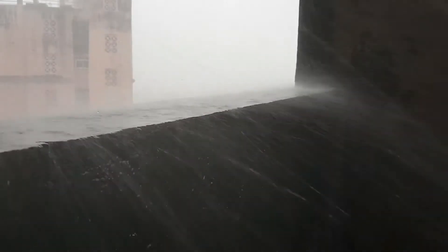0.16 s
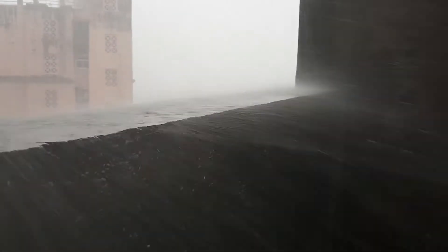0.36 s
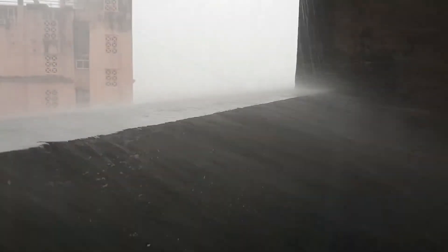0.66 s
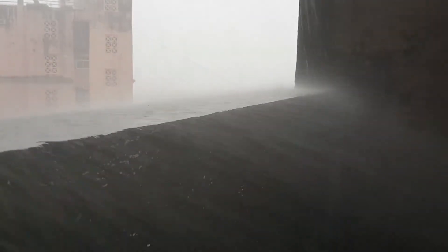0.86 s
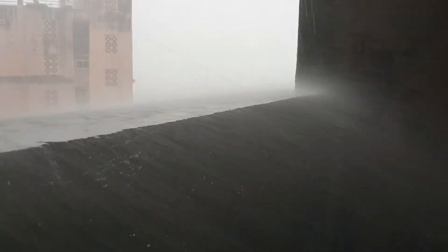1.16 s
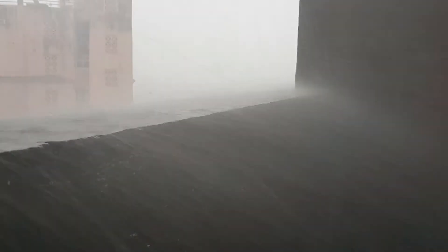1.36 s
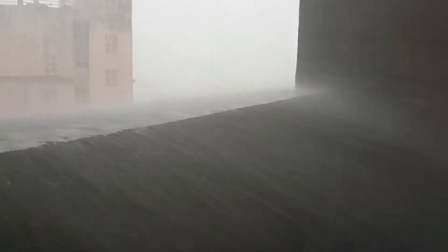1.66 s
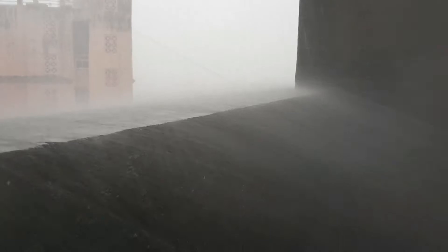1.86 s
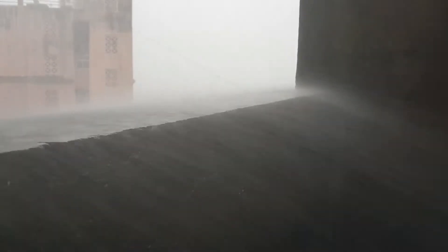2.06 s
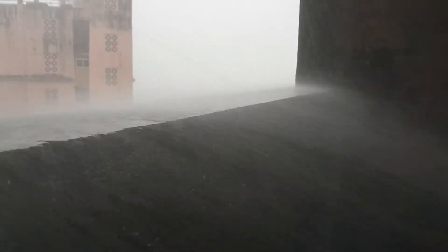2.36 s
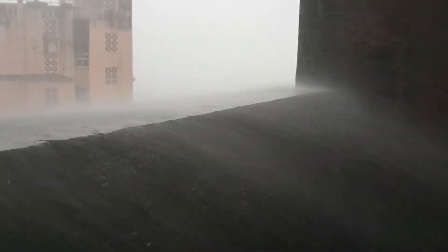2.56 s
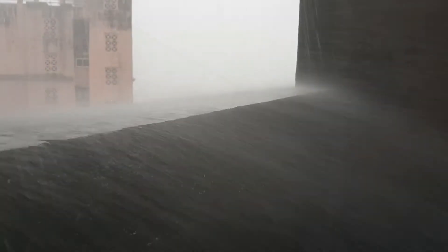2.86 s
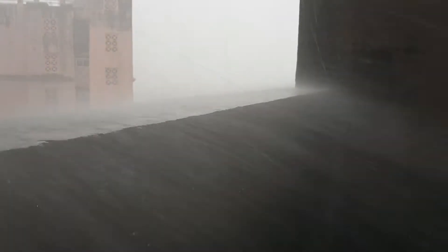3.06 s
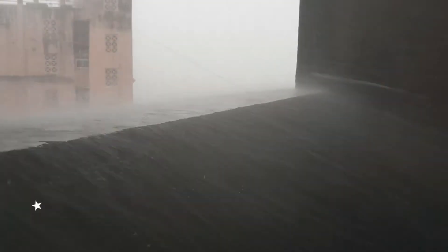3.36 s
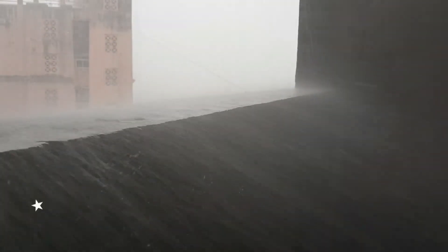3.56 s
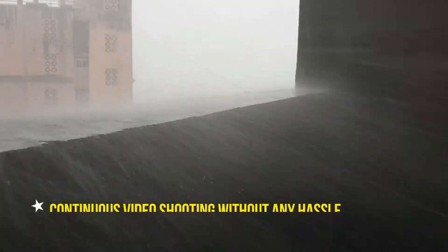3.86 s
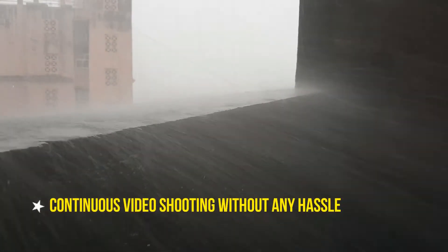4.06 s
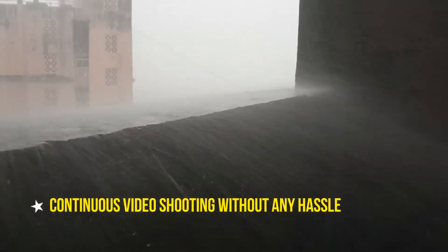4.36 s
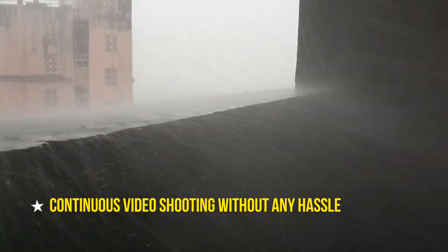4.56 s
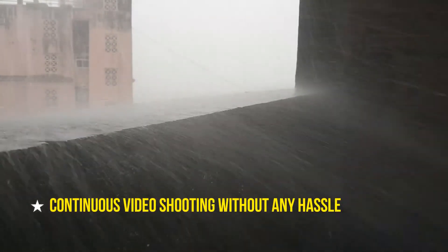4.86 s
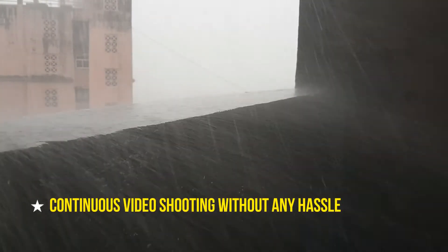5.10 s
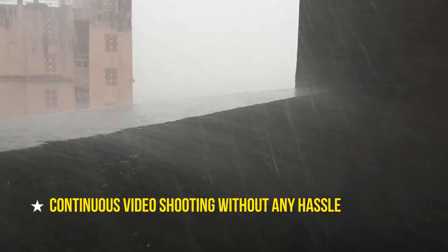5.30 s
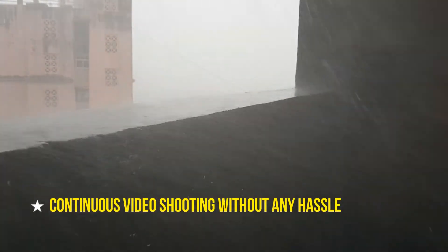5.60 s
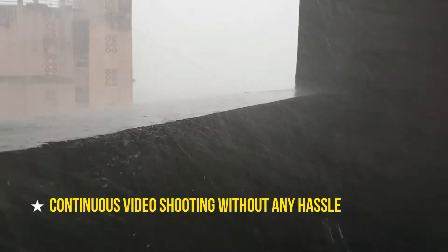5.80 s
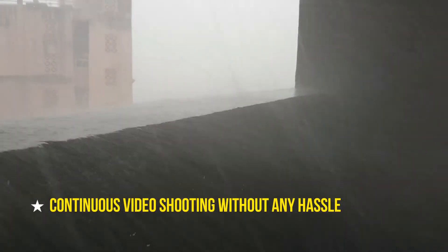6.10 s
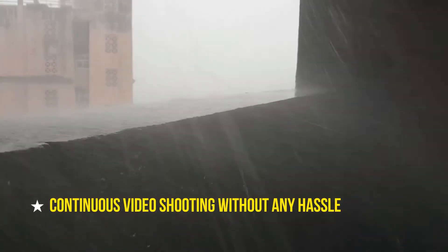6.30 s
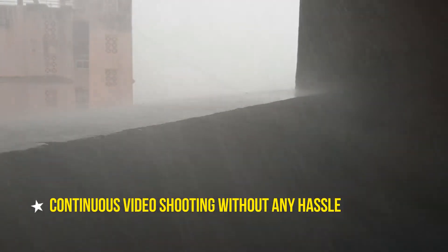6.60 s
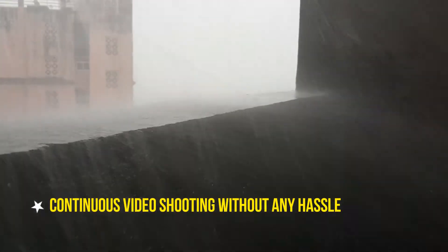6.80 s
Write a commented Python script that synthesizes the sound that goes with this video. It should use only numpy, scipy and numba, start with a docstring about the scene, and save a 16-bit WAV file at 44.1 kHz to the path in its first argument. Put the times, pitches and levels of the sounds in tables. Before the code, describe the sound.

Blown rain pelts a device at a window: rough muffled wind flutter, crowded distorted drop knocks on the left, a softer hollow rush on the right.

```python
"""At an open window in a driving rainstorm, a phone is held out with its two wet microphone ports in the wind.
Gusts blow across the ports, which ring like small bottles: the left one low, the right one higher.
Drops are decaying sines with a shove and a splash; the strong ones overload into short buzzing ticks.
Spray spatters on the left port as filtered random hits.
Behind them lie the steady coloured noise of the downpour and a thin microphone hiss."""
import sys
import numpy as np
from scipy import signal
from scipy.fft import rfft, irfft, next_fast_len
from scipy.io import wavfile
from scipy.ndimage import uniform_filter1d
from numba import njit

SR = 44100
rng = np.random.default_rng(int(sys.argv[2]) if len(sys.argv) > 2 else 0)


def transcribe(signal):
    """Save signal, clipped to [-1, 1], as a 16-bit WAV file at the path in sys.argv[1]."""
    frames = np.atleast_2d(signal).T
    limited = np.clip(frames, -1, 1)
    pcm = np.round(limited * 32767).astype(np.int16)
    wavfile.write(sys.argv[1], SR, pcm)


N = 306054

# Pitch of the left port, lower as it fills with water: start_s, pitch_hz
LEFT_PORT_PITCH = [(0, 480), (1.0, 511), (1.9, 491), (2.9, 567), (3.5, 525), (4.2, 496.6), (5.2, 512.6),
                   (6.1, 482.5), (6.55, 421), (6.94, 483)]
LEFT_WIDTH_HZ = 247  # width of the left port's resonance


def left_microphone():
    """The windward port takes most of the gusts and the drops; sloshing water makes its pitch waver."""
    filled_hz = in_time(LEFT_PORT_PITCH)
    port_hz = filled_hz * np.exp(0.056 * drift(25.0))
    thickness = spray_thickness()
    wind = left_wind(port_hz)
    mist = left_spray(thickness, port_hz)
    drops = left_drops(thickness, filled_hz)
    return wind + mist + drops


# Turbulence and blown spray outside the left port: pitch_hz, level_db (per Hz, relative)
LEFT_EDDY_COLOUR = [(15, -9), (30, -19), (60, -7), (110, -1), (220, -3.5), (350, -8.5), (520, -6.5),
                    (750, -19.5), (1100, -16.5), (2000, -27), (4000, -29), (7000, -43), (15000, -14)]
# Wind on the left port before brief swings, flutter and trim: start_s, level_db
LEFT_WIND_LEVEL = [(0, -17), (0.2, -2.5), (0.45, -8), (1.05, -8), (1.4, -19), (1.88, -1), (2.15, -9),
                   (2.42, -19), (3.0, -11), (3.35, -15), (4.0, -7), (4.5, -11), (5.15, -6), (5.35, -15),
                   (5.65, -5.5), (6.2, -10.5), (6.55, 1.5), (6.94, -8)]


def left_wind(port_hz):
    """Fluttering wind with brief swings on top, blowing across the low port."""
    flutter_db = 1.92 * drift(18)
    level_db = in_time(LEFT_WIND_LEVEL) + brief_swings() + flutter_db
    blown = buffeting(LEFT_EDDY_COLOUR, port_hz, LEFT_WIDTH_HZ, lumpy_db=4.0, lumps_hz=59)
    return from_db(level_db - 2.5) * blown


# Short gusts and one brief slackening, timed at the middle: start_s, level_db (change there)
WIND_SWINGS = [(3.691, 11.5), (3.99, 7), (4.1, 6.5), (4.34, 6.5), (4.6, 10), (5.04, 5), (5.492, 15.5),
               (5.691, 4), (5.9, 7.5), (6.37, -2), (6.62, 1.5)]
SWING_HALF_S = 0.049  # from the middle to 1/e of the change in dB


def brief_swings():
    """Short gusts and one brief slackening, each a bell-shaped change in dB."""
    t = np.arange(N) / SR
    return sum(db * np.exp(-((t - s) / SWING_HALF_S) ** 2) for s, db in WIND_SWINGS)


# Distinct drops striking the left port, mostly big, before the trim on all drops: start_s, level_db
LEFT_DISTINCT_DROPS = [(0.168, 1.5), (0.254, 19.5), (0.273, 15), (0.448, -4), (0.473, 23.5), (0.507, 4),
                       (0.642, 4), (0.66, 19), (0.675, 11), (0.904, 16.5), (0.978, 5), (1.0, 14),
                       (1.158, 7.5), (1.188, 6.5), (1.254, -1.5), (1.426, 2.5), (1.499, 7.5), (1.524, 23.5),
                       (1.551, 8), (1.669, 19.5), (1.718, 3), (1.781, 5), (1.823, 17), (1.854, 5),
                       (1.888, 17.5), (1.912, 7.5), (1.923, 3.5), (1.993, 2), (2.092, 8.5), (2.108, 10.5),
                       (2.142, 10), (2.193, 14.5), (2.213, 18.5), (2.23, 17.5), (2.306, 20.5), (2.33, 16),
                       (2.378, 11.5), (2.459, -11), (2.472, 19), (2.548, 19.5), (2.599, 17.5), (2.755, 15),
                       (2.824, -1), (2.936, 20.5), (2.96, 8), (2.976, 2.5), (2.984, 15), (3.056, 6.5),
                       (3.076, 10), (3.086, 18), (3.128, 13), (3.159, 4), (3.264, 6.5), (3.286, 14.5),
                       (3.455, 13), (3.569, 19.5), (3.639, 11), (3.717, 2), (3.982, 6), (3.997, 4.5),
                       (4.152, 14.5), (4.221, 10.5), (4.252, 19.5), (4.277, 19.5), (4.295, 11), (4.35, 6.5),
                       (4.389, 17.5), (4.419, 7.5), (4.471, 11), (4.494, 17), (4.541, 2.5), (4.585, 15),
                       (4.597, 18), (4.632, 2), (4.689, 18.5), (4.721, 27.5), (4.772, 5), (4.873, 17.5),
                       (4.985, 11.5), (5.043, 12), (5.067, 16.5), (5.103, 19.5), (5.129, 17.5),
                       (5.157, 12.5), (5.18, 22), (5.207, 18.5), (5.286, 3), (5.34, 2), (5.448, 11),
                       (5.465, 3), (5.531, 7), (5.585, 11), (5.659, 3), (5.682, 13), (5.821, 4),
                       (5.836, 5.5), (5.87, 3), (5.88, 16.5), (5.904, 19.5), (5.922, 5), (5.956, 19),
                       (5.983, 23), (6.006, 20.5), (6.045, 4.5), (6.142, 24), (6.166, 23.5), (6.185, 16.5),
                       (6.359, 2), (6.419, 8), (6.435, 23), (6.505, 19.5), (6.521, 9.5), (6.559, 4),
                       (6.587, 14.5), (6.602, 18), (6.648, 11), (6.69, 24.5), (6.733, 19), (6.776, 8.5),
                       (6.807, 18.5), (6.831, 5), (6.856, 23.5), (6.875, 17)]
SMALL_PER_S, SMALL_DB = 22.0, -2  # at mean spray thickness; before the same trim
DROP_DETUNE = 0.059  # each drop leaves a different plug of water: spread of its ring, as a share of the pitch


def left_drops(thickness, filled_hz):
    """Distinct drops, and small ones at random among them, more often in thick spray."""
    falling = list(LEFT_DISTINCT_DROPS) + small_drops(SMALL_PER_S * thickness, SMALL_DB)
    rows = []
    for s, db in falling:
        hz = filled_hz[int(s * SR)] * np.exp(rng.normal(0, DROP_DETUNE))
        rows.append((s, db, hz))
    drops = strikes(rows, rise_s=0.00045, fall_s=0.0026, glide=0.089, shove_db=-9.5,
                    splash_db=-19.5, splash_s=0.0026, splash_hz=1970)
    return from_db(-1.5) * drops


def small_drops(per_s, level_db):
    """Rows (start_s, level_db) of drops at chance moments, with sizes scattered about a level."""
    moments = np.flatnonzero(rng.random(N) < per_s / SR)
    spread_db = 1.5
    db = level_db + spread_db * rng.standard_normal(N)
    return [(i / SR, db[i]) for i in moments]


def strikes(rows, rise_s, fall_s, glide, shove_db, splash_db, splash_s, splash_hz):
    """Each drop (start_s, level_db, pitch_hz) shoves the air, rings the port and bursts with a splash."""
    lead = SR // 50
    out = np.zeros(N + SR)
    t = np.arange(-lead, 4 * lead) / SR
    since = np.maximum(t, 0)
    swell = 2 / (1 + np.exp(np.minimum(-t / rise_s, 50)))
    bass = signal.butter(2, [90, 280], "band", fs=SR, output="sos")
    # water thrown up by the burst falls back as a faint longer tail
    scatter_db, scatter_s = -40, 0.012
    splashing = np.exp(-since / splash_s) + from_db(scatter_db) * np.exp(-since / scatter_s)
    for s, db, hz in rows:
        phase = rng.random()
        bend = rng.normal(0, glide)
        cycles = hz * (t + bend * fall_s * np.tanh(t / fall_s))  # the spreading drop bends the pitch
        tone = np.sin(2 * np.pi * (cycles + phase))
        shove = rms_one(signal.sosfilt(bass, rng.standard_normal(len(t))))
        ring = (tone + from_db(shove_db) * shove) * np.exp(-since / fall_s)
        splash = rms_one(low_pass(rng.standard_normal(len(t)), splash_hz, order=2)) * splashing
        start = max(round(s * SR), 0)
        out[start:start + len(t)] += from_db(db) * swell * (ring + from_db(splash_db) * splash)
    return out[lead:lead + N]


# Thickness of the blown spray; only its swing about the mean counts: start_s, level_db
SPRAY_LEVEL = [(0.0, -59.5), (0.67, -44), (1.0, -50.5), (1.37, -46), (2.16, -46), (2.84, -57.5),
               (3.19, -44.5), (3.73, -59.5), (4.39, -40.5), (4.79, -56.5), (5.14, -41.5), (5.84, -51.5),
               (6.18, -63.5), (6.43, -42), (6.61, -35.5), (6.94, -51.5)]


def spray_thickness():
    """Gain of the spray about its mean in dB, taking only a share of the swing."""
    level_db = in_time(SPRAY_LEVEL)
    share = 0.4
    return from_db(share * (level_db - level_db.mean()))


def left_spray(thickness, port_hz):
    """Spray on the left port grows both denser and louder as it thickens."""
    mist = spray(port_hz, LEFT_WIDTH_HZ, per_s=220 * thickness, spread_db=30.0,
                 spatter_db=-22.5, spatter_hz=3300)
    return from_db(-21.5) * thickness * mist


def spray(port_hz, width_hz, per_s, spread_db, spatter_db, spatter_hz):
    """Fine droplets land in flurries: each pushes softly on the port and spatters for about a millisecond."""
    sizes = from_db(spread_db * rng.random(N)) * rng.choice([-1, 1], N)
    flurries = from_db(7.0 * drift(20))
    landed = rng.random(N) < per_s * flurries / SR
    hits = sizes * landed + 1e-18
    push = rms_one(port(low_pass(hits, 1600, order=2), port_hz, width_hz))
    decay_s = 0.00054
    envelope = signal.lfilter([1], [1, -np.exp(-1 / (decay_s * SR))], hits)
    spatter = low_pass(envelope * rng.standard_normal(N), spatter_hz, order=3)
    return push + from_db(spatter_db) * rms_one(spatter)


RIGHT_PORT_HZ, RIGHT_WIDTH_HZ = 1067, 116  # middle pitch, and width of the resonance


def right_microphone():
    """The sheltered port stays clearer and rings about an octave higher, in a hollow rush that comes and goes."""
    port_hz = RIGHT_PORT_HZ * np.exp(0.042 * drift(4.1))
    return right_wind(port_hz) + right_drops()


# Turbulence and blown spray outside the right port: pitch_hz, level_db (per Hz, relative)
RIGHT_EDDY_COLOUR = [(15, -24), (30, -17), (60, 6), (120, 1), (250, -2.5), (500, -4.5), (800, -11),
                     (1100, -16.5), (1600, -22.5), (2500, -33.5), (5000, -40), (10000, -42.5), (15000, -22)]
# Wind on the right port before flutter and trim: start_s, level_db
RIGHT_WIND_LEVEL = [(0, -26.5), (0.8, -21), (1.08, -27), (1.3, -10.5), (1.5, -15.5), (1.78, -16.5),
                    (2.55, -14), (3.1, -19.5), (3.95, -24), (4.35, -28.5), (4.9, -27), (5.15, -31),
                    (5.45, -22), (5.65, -28), (6.0, -32.5), (6.28, -15.5), (6.48, -27.5), (6.94, -23.5)]


def right_wind(port_hz):
    """Fluttering wind across the higher port, strongest in a lull of the left one."""
    flutter_db = 2.45 * drift(18)
    level_db = in_time(RIGHT_WIND_LEVEL) + flutter_db
    blown = buffeting(RIGHT_EDDY_COLOUR, port_hz, RIGHT_WIDTH_HZ, lumpy_db=3.0, lumps_hz=62)
    return from_db(level_db + 1.03) * blown


# Distinct drops striking the right port, before the trim on all of them: start_s, level_db
RIGHT_DISTINCT_DROPS = [(0.229, -1.5), (1.265, 1.5), (1.332, 1), (1.386, 0.5), (2.248, 1), (2.414, -2.5),
                        (2.529, 1), (2.884, -9), (3.028, -1.5), (4.758, -2.5), (5.468, -5), (6.375, -2.5)]


def right_drops():
    """A few drops ring the right port at its middle pitch, with hardly any splash."""
    rows = [(s, db, RIGHT_PORT_HZ) for s, db in RIGHT_DISTINCT_DROPS]
    drops = strikes(rows, rise_s=0.0017, fall_s=0.0022, glide=0.045, shove_db=-8.5,
                    splash_db=-44, splash_s=0.0015, splash_hz=1500)
    return from_db(-1.0) * drops


def buffeting(eddies, port_hz, width_hz, lumpy_db, lumps_hz):
    """Eddies arrive in lumps and blow across a port; the mean force over a tenth of a second is steady."""
    lumps = from_db(lumpy_db * drift(lumps_hz))
    blown = port(noise(eddies) * lumps, port_hz, width_hz)
    return blown / np.sqrt(uniform_filter1d(blown ** 2, size=SR // 10) + 1e-12)


def port(pressure, hz, width_hz):
    """The air plug in a port passes the bass, rings at its own pitch and damps the treble."""
    angle = 2 * np.pi * hz / SR * np.ones(N)
    return two_pole(pressure, angle, np.exp(-np.pi * width_hz / SR))


@njit
def two_pole(x, angle, r):
    """Resonant low-pass with a moving centre, gain 1 in the deepest bass."""
    y = np.zeros(len(x))
    for i in range(2, len(x)):
        a = 2 * r * np.cos(angle[i])
        y[i] = (1 - a + r * r) * x[i] + a * y[i - 1] - r * r * y[i - 2]
    return y


# Colour of the rain falling all around: pitch_hz, level_db (per Hz, relative)
RAIN_COLOUR = [(100, 16.5), (500, 14), (1200, -13), (2500, -22.5), (5000, -38), (9000, -30), (16000, -42)]


def downpour():
    """The rain all around merges into steady noise, independent at each microphone."""
    return from_db(-48) * np.array([noise(RAIN_COLOUR), noise(RAIN_COLOUR)])


# Colour of the microphones' own thin hiss: pitch_hz, level_db (per Hz, relative)
HISS_COLOUR = [(100, -7), (9000, -13.5), (12500, 5), (16000, -8.5)]


def microphone_hiss():
    """Steady self-noise, a little stronger on the left."""
    return from_db([[-68], [-73]]) * np.array([noise(HISS_COLOUR), noise(HISS_COLOUR)])


def noise(spectrum):
    """Noise of unit rms, coloured by a curve of dB over log frequency."""
    hz, db = np.transpose(spectrum)
    size = next_fast_len(N)
    bins = np.maximum(np.fft.rfftfreq(size, 1 / SR), 1)
    colour = from_db(np.interp(np.log(bins), np.log(hz), db))
    return rms_one(irfft(rfft(rng.standard_normal(size)) * colour, size)[:N])


def drift(rate_hz):
    """Random wander of unit rms, slow or fast as rate_hz sets: noise through a double pole there."""
    step = 40  # samples between the computed points
    r = np.exp(-2 * np.pi * rate_hz * step / SR)
    settle = 2000
    white = rng.standard_normal(N // step + settle + 2)
    wander = signal.lfilter([1], [1, -2 * r, r * r], white)[settle:]
    return np.interp(np.arange(N) / step, np.arange(len(wander)), rms_one(wander))


def low_pass(x, hz, order):
    """Butterworth low-pass."""
    return signal.sosfilt(signal.butter(order, min(hz, SR / 2 - 1), fs=SR, output="sos"), x)


def in_time(rows):
    """A curve of (start_s, value) rows, sample by sample."""
    s, value = np.transpose(rows)
    return np.interp(np.arange(N) / SR, s, value)


def from_db(db):
    """Decibels to gain."""
    return 10 ** (np.asarray(db) / 20)


def rms_one(x):
    """Scale to unit rms."""
    return x / np.sqrt(np.mean(x ** 2) + 1e-20)


def scene():
    """Two ports in the fluttering wind over the steady rush of the downpour."""
    ports = np.array([left_microphone(), right_microphone()])
    return ports + downpour() + microphone_hiss()


def record(dry):
    """The microphones overload with a narrow knee and fizz while pinned; the top is softened and cut."""
    knee = 16.3  # exponent: higher is a sharper corner
    squared_off = dry / (1 + np.abs(dry) ** knee) ** (1 / knee)
    pinned = np.tanh(np.abs(dry - squared_off) / 1.05)
    fizz = from_db(-31.5) * pinned * rng.standard_normal(dry.shape)
    softened = low_pass(squared_off, 8500, order=1) + fizz
    top_cut = signal.ellip(8, 0.1, 60, 16000, fs=SR, output="sos")
    return signal.sosfilt(top_cut, softened)


dry = scene()
out = record(dry)
transcribe(out)
```